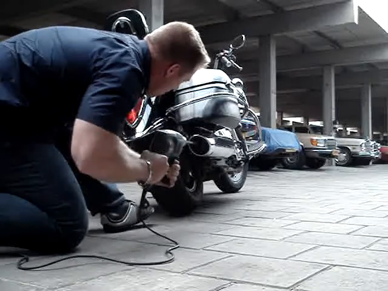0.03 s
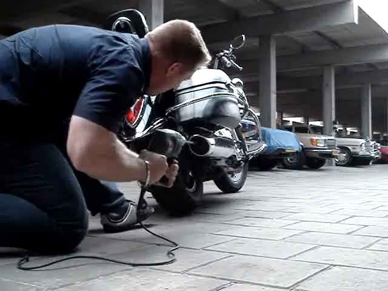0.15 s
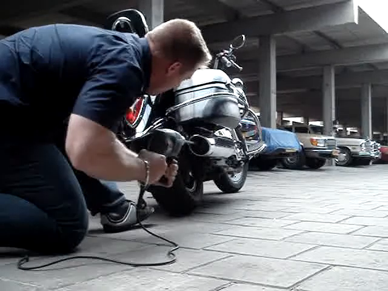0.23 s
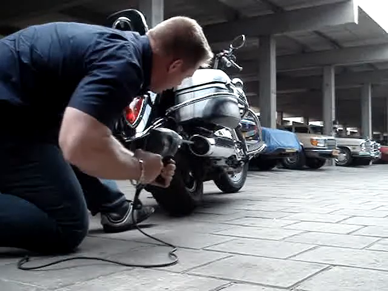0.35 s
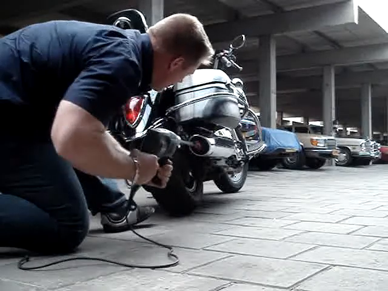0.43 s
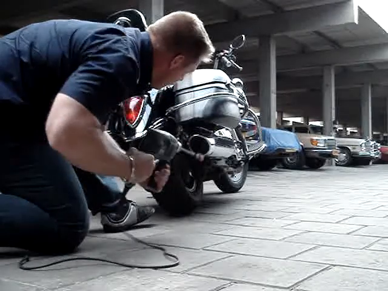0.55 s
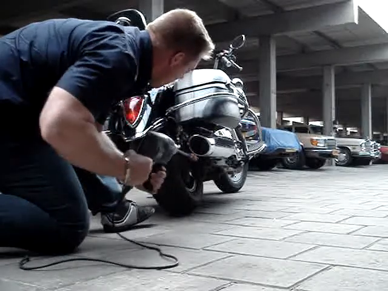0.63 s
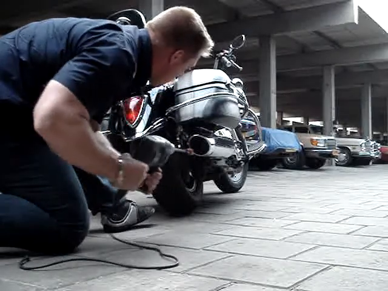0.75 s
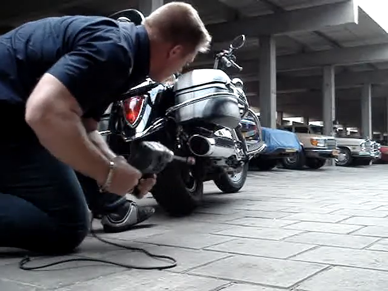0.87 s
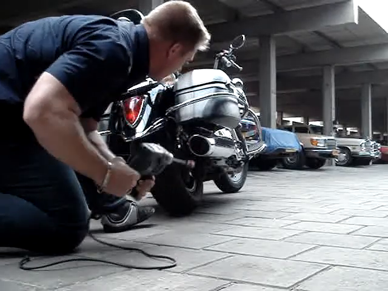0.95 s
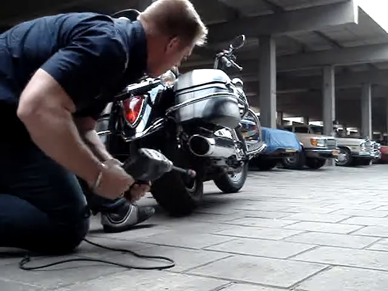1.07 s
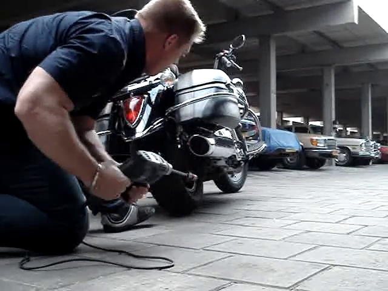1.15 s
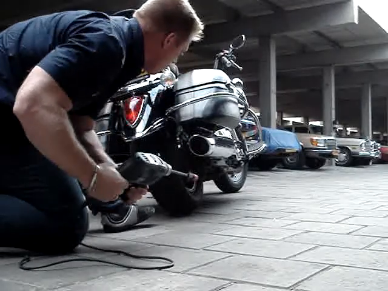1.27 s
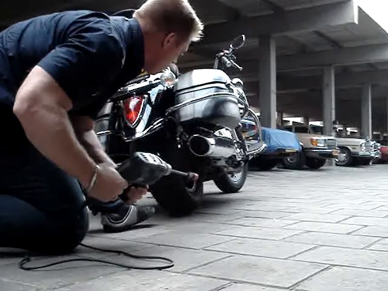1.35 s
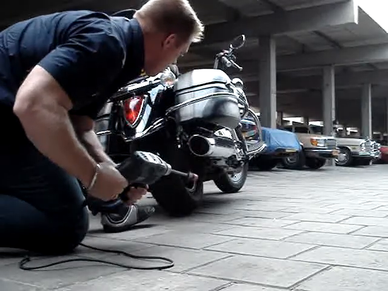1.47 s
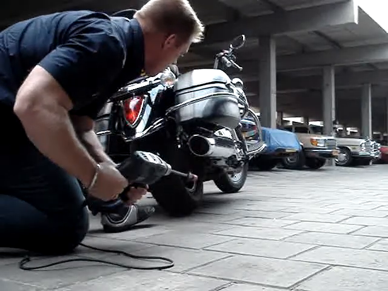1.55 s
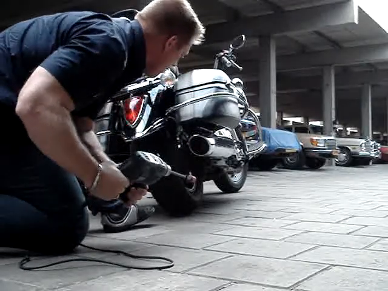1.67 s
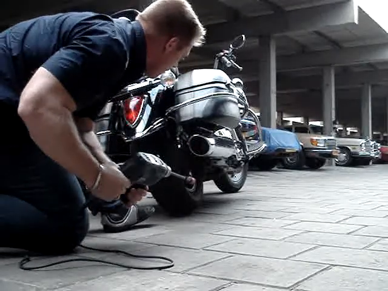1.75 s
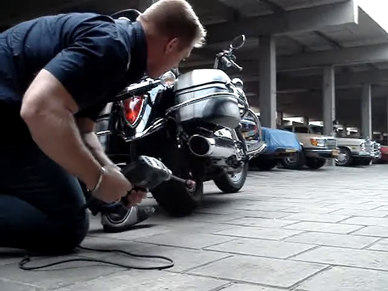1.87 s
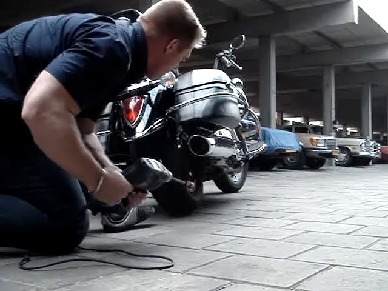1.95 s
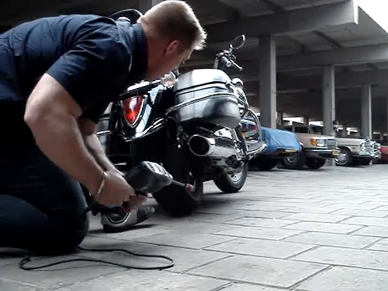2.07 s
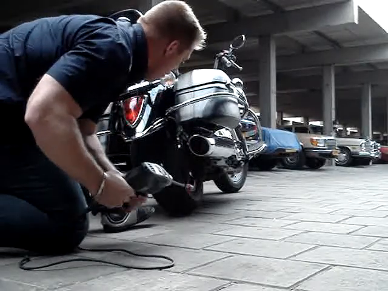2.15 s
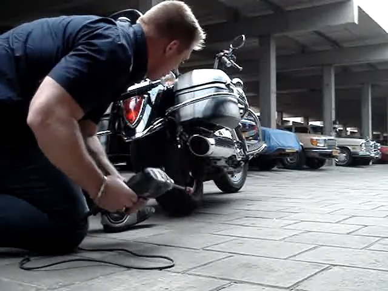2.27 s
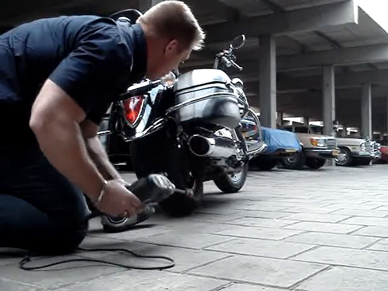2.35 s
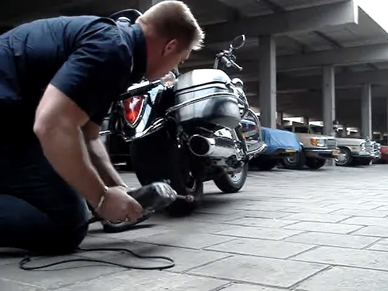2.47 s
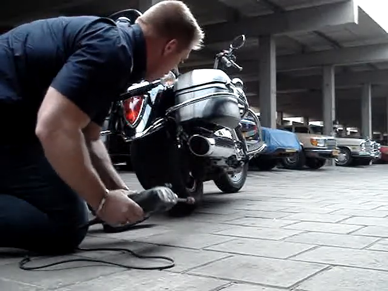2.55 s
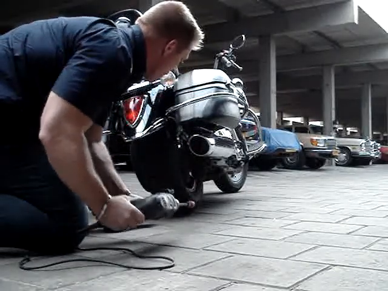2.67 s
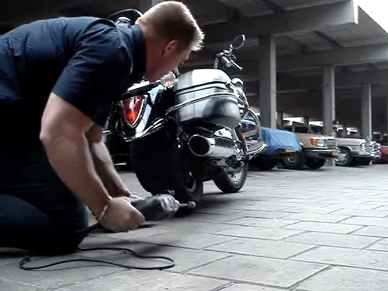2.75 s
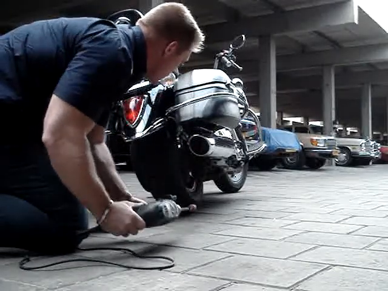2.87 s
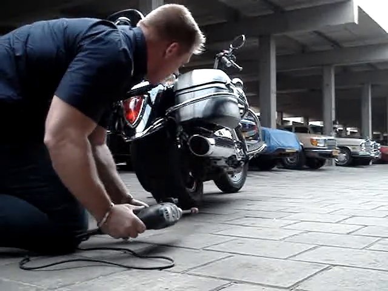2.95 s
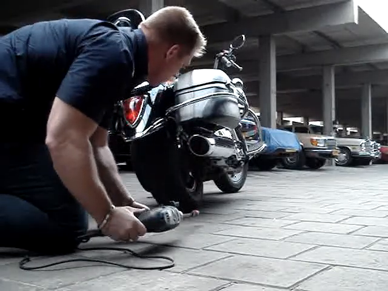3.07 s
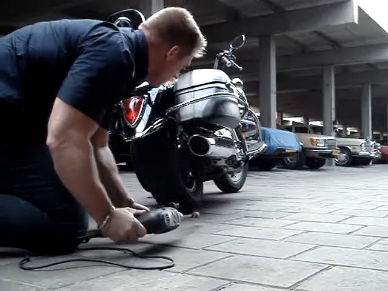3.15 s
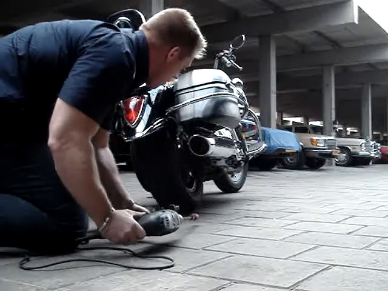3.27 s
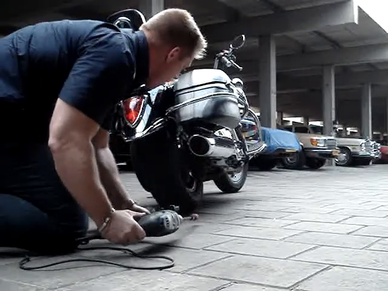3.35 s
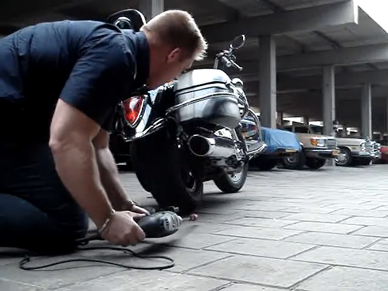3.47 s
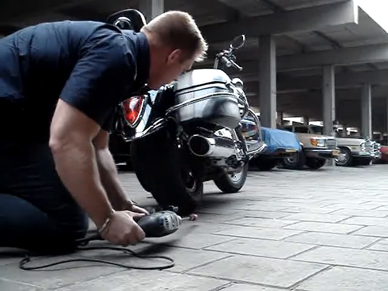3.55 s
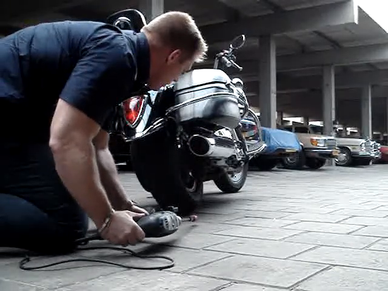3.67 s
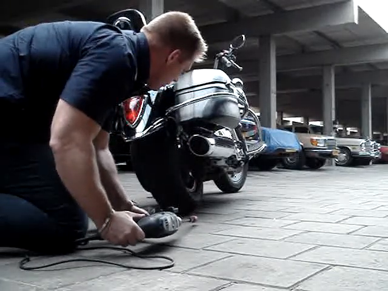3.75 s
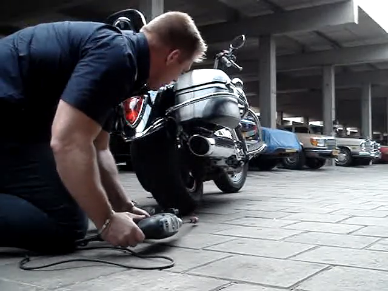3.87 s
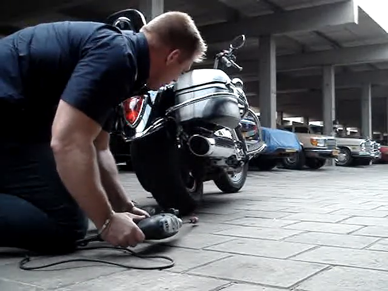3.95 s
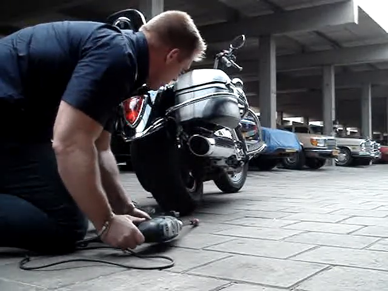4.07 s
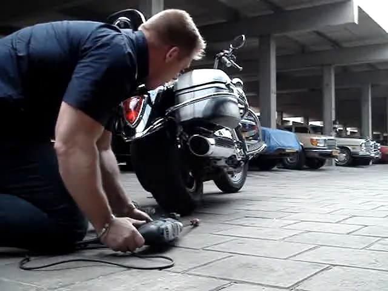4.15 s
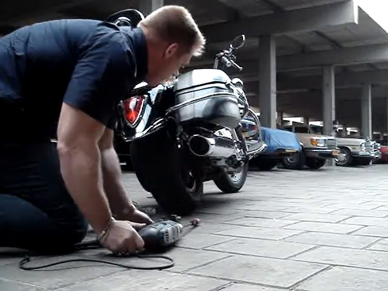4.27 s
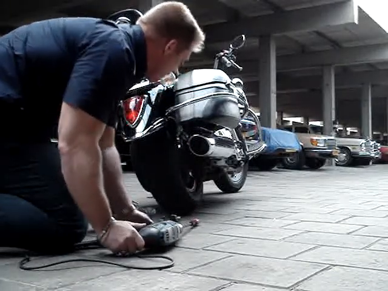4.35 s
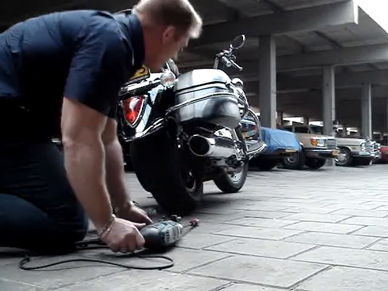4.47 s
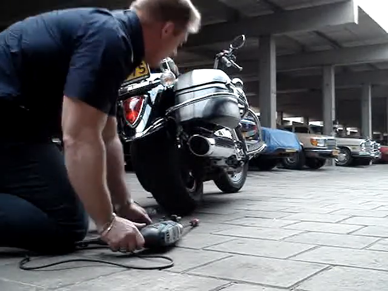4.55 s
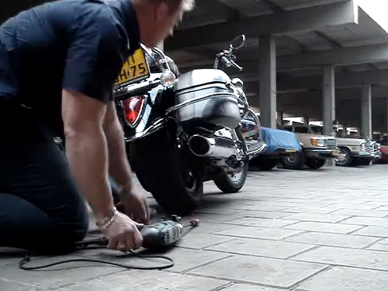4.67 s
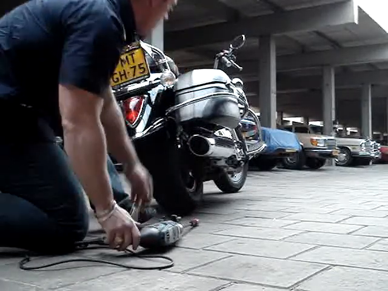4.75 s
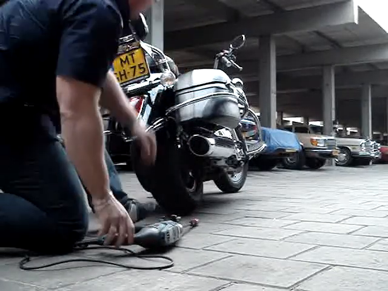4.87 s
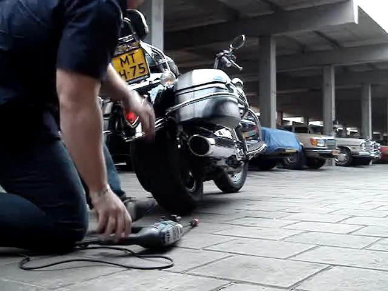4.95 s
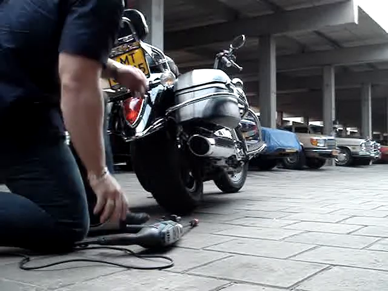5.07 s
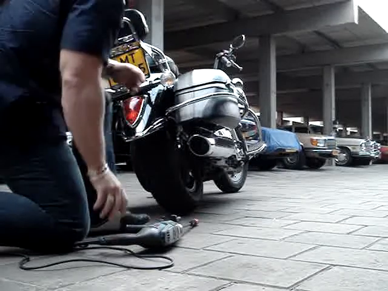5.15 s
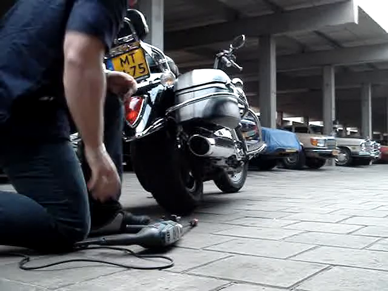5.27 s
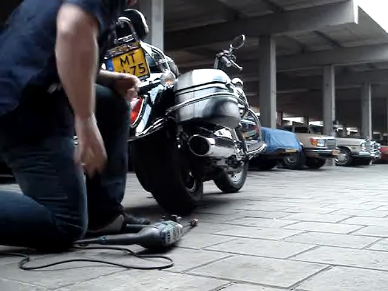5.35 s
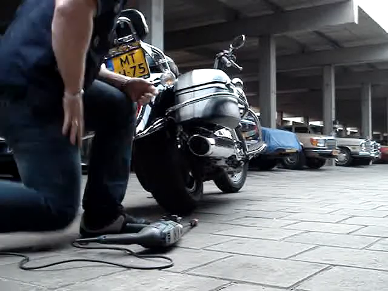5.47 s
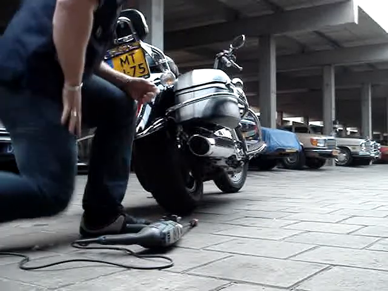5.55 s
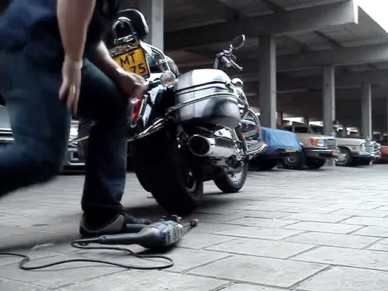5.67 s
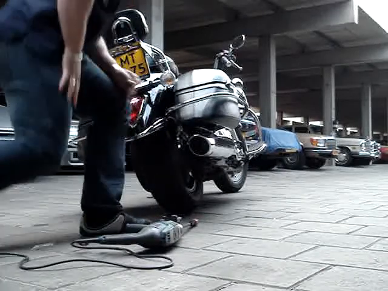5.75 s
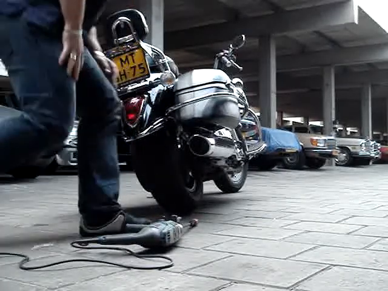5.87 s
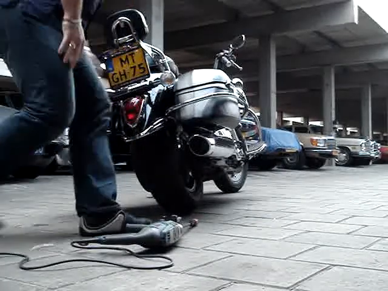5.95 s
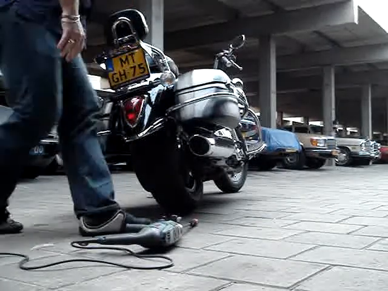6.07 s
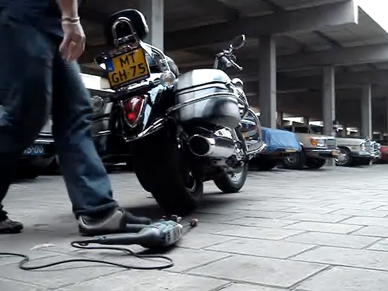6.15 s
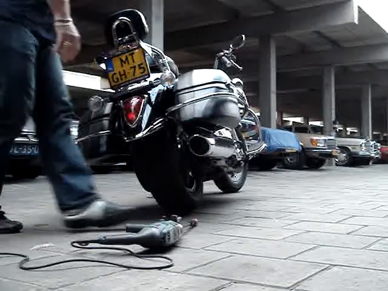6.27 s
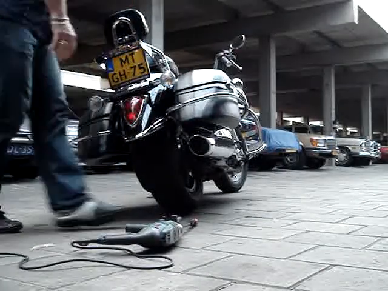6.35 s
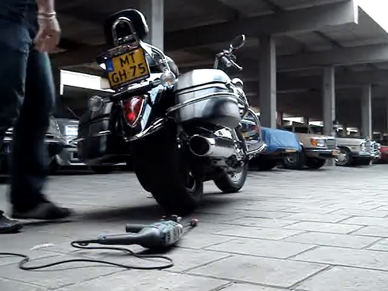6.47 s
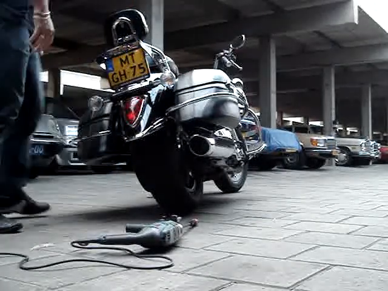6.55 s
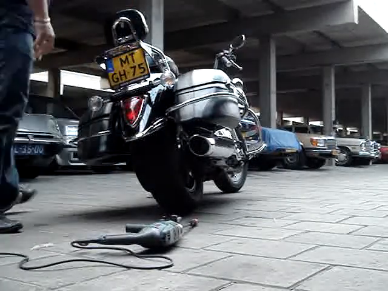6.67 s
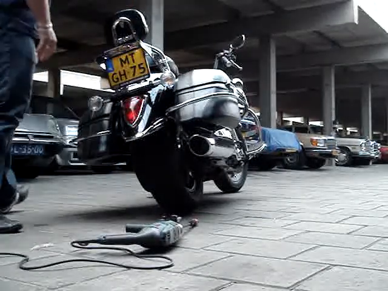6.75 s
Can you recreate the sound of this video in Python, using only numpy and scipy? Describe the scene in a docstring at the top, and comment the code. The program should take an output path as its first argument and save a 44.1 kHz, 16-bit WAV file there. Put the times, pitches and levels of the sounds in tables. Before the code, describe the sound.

A corded drill grinds on a steel pipe, then winds down, followed by a few knocks and shoe scuffs on paving.

```python
"""Drill on an exhaust pipe, open parking deck

Close to one microphone, a corded drill grinds at the mouth of a motorcycle's steel exhaust pipe, which
rings as the bit scrapes and catches. Pulled off, the drill coasts to a stop, its gear and commutator
whines sliding down through the housing resonances. The man lays it on the paving, stands up and steps
away. The concrete roof and pillars throw back short echoes; the town rumbles in the distance."""
import sys
import numpy as np
from scipy import signal
from scipy.fft import rfft, irfft, next_fast_len
from scipy.io import wavfile

SR = 44100
rng = np.random.default_rng(int(sys.argv[2]) if len(sys.argv) > 2 else 0)


def persist_wave(psi):
    """Save psi, clipped to +-1, as 16-bit WAV."""
    counts = np.round(np.clip(psi, -1, 1) * 32767).astype(np.int16)
    wavfile.write(sys.argv[1], SR, np.atleast_2d(counts).T)


N = 300317
TIME = np.arange(N) / SR

# gear mesh tones: (multiple of rotor speed, relative level [dB])
MESH_TONES = [(12, 7), (18, 3), (36, 3), (60, 1), (72, 3), (84, -2), (96, -3), (108, -6), (120, -2),
              (132, -7), (144, -7)]
# drill housing, rattled by the teeth: (frequency [Hz], width [Hz], relative level [dB])
HOUSING_MODES = [(654, 60, -14), (900, 110, -11), (1490, 70, -5), (1643, 80, 0), (1788, 160, -1.5),
                 (2120, 80, -2), (2210, 190, -3.5), (2770, 190, -4.5), (3570, 330, -8), (6600, 1200, -2)]
# gear case: (frequency [Hz], width [Hz], then level [dB] for commutator, fan, commutator octave, teeth)
GEARCASE_MODES = [(680, 130, -53, -70, -66, -61), (980, 200, -50, -70, -62, -66),
                  (1340, 120, -46, -66, -56, -63), (1630, 100, -35, -62, -52, -50),
                  (1750, 110, -37, -62, -45, -55), (1930, 80, -38, -62, -48, -58),
                  (2090, 180, -44, -62, -38.5, -47), (2320, 200, -58, -60, -46, -60),
                  (2830, 170, -43, -54, -54, -53), (3760, 330, -31, -58, -55, -61),
                  (4350, 220, -37, -46, -58, -58), (4880, 380, -29, -48, -46, -66),
                  (5230, 220, -39, -38, -46, -52), (6100, 320, -30.5, -32, -46, -51),
                  (6550, 330, -33, -37, -33.5, -46), (7100, 520, -39, -31, -46, -52),
                  (8000, 400, -48, -26.5, -54, -53), (8950, 650, -54, -27.5, -53, -53),
                  (9750, 450, -58, -34, -54, -58)]
# the slowing spindle rubs: (peak time [s], boost of the running noise [dB], half length [s])
SPINDLE_RUBS = [(1.998, -1, 0.023), (2.79, 0.5, .04), (3.086, 4.5, 0.069)]
# steel pipe: (frequency [Hz], width [Hz], relative level rubbed [dB], relative level struck [dB])
PIPE_MODES = [(543, 10, -4.5, .5), (665, 25, -16, -10), (735, 12, -4, -12), (917, 14, -3, -14),
              (1050, 20, -9, -7), (1338, 12, -5, -20), (1390, 8, -1, -16), (1432, 12, -5, -20),
              (2196, 6, -3.5, -22), (2408, 4, 1.5, 0), (2745, 14, -2, -10), (3208, 7, 1.5, -7),
              (3768, 12, -8, -20), (4110, 14, -7, -5), (4360, 14, -2.5, -20)]
# the bit catches on the rim: (time [s], blow level [dB], ring level [dB])
RIM_CATCHES = [(0.057, -16.5, -33.5), (0.176, -13.5, -56), (0.231, -15, -56), (0.490, -14, -28.5),
               (0.502, -13, -40), (0.507, -14, -45), (.5295, -13.5, -25)]
# the bit squeals: (peak time [s], level [dB], half length [s])
BIT_SQUEALS = [(0.038, -24, 0.16), (.34, -27, .07)]
# drill, hands and shoes knock:
# (time [s], level over 10 ms [dB], low edge [Hz], high edge [Hz], t60 [s], share of bright crack)
PAVING_KNOCKS = [(3.973, -53, 905, 2800, 0.017, .23), (4.132, -46.5, 690, 3200, 0.016, .23),
                 (4.2725, -48.5, 484, 4000, 0.025, .23), (4.3222, -33, 280, 2900, 0.024, .3),
                 (4.439, -40.5, 450, 2000, 0.028, .3), (5.091, -35.5, 400, 2300, 0.03, .2),
                 (5.250, -48, 3040, 6530, 0.0093, .23), (6.0695, -45.5, 700, 1800, 0.008, .08),
                 (6.1068, -38, 220, 800, 0.039, .15), (6.4165, -49.5, 2370, 5400, 0.009, .23)]
# ringing bodies: (frequency [Hz], level [dB], t60 [s])
LANDING_MODES = [(205, -39, .1), (255, -27, .04), (790, -26.5, .022), (861, -43, .3), (925, -43, .3),
                 (990, -29, .022), (1448, -50, .2), (1750, -42, .05), (2030, -53, .25), (5510, -55, .38)]  # the drill as it is laid down
HEEL_MODES = [(330, -32.5, .03), (470, -32.5, .03), (690, -32.5, .03)]  # the hollow heel of the first step
# soles and cloth slide: (peak time [s], level [dB], rise [s], fall [s], low edge [Hz], high edge [Hz])
SOLE_AND_CLOTH_SCUFFS = [(5.106, -40, 0.0095, 0.046, 646, 11000), (5.105, -43.5, .012, .03, 1500, 2100),
                         (5.32, -60, 0.02, 0.054, 4000, 9200), (5.428, -40.5, 0.0043, 0.0055, 2800, 5870),
                         (5.56, -51.5, 0.07, 0.072, 350, 1710), (5.7, -56.5, 0.66, 0.49, 1120, 8600),
                         (6.255, -51, 0.074, 0.068, 920, 9000), (6.251, -48, 0.013, 0.019, 1700, 6000),
                         (6.287, -49.5, 0.011, 0.016, 3600, 10000)]
# reflections off roof and pillars: (delay [s], level [dB])
DECK_ECHOES = [(.015, -24), (.024, -22), (.052, -24), (.073, -24)]
# noise spectra: (frequency [Hz], relative level [dB])
FAN_SPECTRUM = [(60, -39.5), (130, -14.5), (200, -17), (320, -9), (430, -3), (560, 0.5), (900, 4.5),
                (1250, 1), (1700, -6), (3000, -1), (6000, -23.5), (8500, -12.5), (10000, -19),
                (12000, -56.5)]
GEAR_SPECTRUM = [(500, -44.5), (1100, 14), (1450, 16), (1800, 14.5), (2000, 11), (2800, -1), (3300, -4),
                 (6000, -33)]
BRUSH_SPECTRUM = [(1500, -21), (2700, -3.5), (3300, -2), (3700, 1.5), (4300, -0.5), (4650, 0), (5150, -1.5),
                  (5700, -1), (6500, -12), (8000, -36)]
BEARING_SPECTRUM = [(4500, -38.5), (5500, -3), (6000, 4), (6800, 6), (7300, 3.5), (7900, 1.5), (8600, -7.5),
                    (9400, -2), (10000, -24)]
SCRAPE_SPECTRUM = [(70, -30), (135, -3), (200, -12), (320, -31), (520, -4), (1500, 3), (2500, 5.5),
                   (4000, 5), (5000, -7), (6000, 1), (6800, 4), (7600, -3), (9500, -19)]
KNOCK_SPECTRUM = [(60, -27), (220, -20), (370, 4), (480, -1.5), (750, 4), (1150, -3), (1650, -3),
                  (2500, -5), (5500, -4.5), (10000, -14.5)]
GRIT_SPECTRUM = [(150, -12), (600, 13), (1200, 7), (1720, 6.5), (2100, 3.5), (2800, 2), (5000, 0),
                 (7500, -3), (10000, -9)]
TOWN_SPECTRUM = [(15, -46), (25, -17), (42, -6), (152, -1.5), (227, -4), (257, -3.5), (307, -5),
                 (506, -5.5), (546, -5), (684, -7), (1070, -10.5), (1220, -12), (1910, -15), (7780, -21.5),
                 (10000, -29), (13000, -86), (22000, -120)]

# loudness follows speed: (level at high speed [dB], knee [turns/s], loss per halving below it [dB])
AIR_LAW = (-24.5, 200, 15.2)
RATTLE_LAW = (-26.5, 446, 4.32)
HISS_LAW = (-23.5, 199, 12.76)
SIZZLE_LAW = (-22.5, 364, 12.5)
HUM_LAW = (-37.4, 375, 20)

WHINE_ORDERS = (24, 39, 48)  # commutator, fan, commutator octave [multiples of rotor speed]
TEETH_PER_TURN = MESH_TONES[0][0]
FULL_TURNS_PER_S, TRIGGER_OFF_S = 368, .415
FRICTION, GREASE, FAN_DRAG = 58.6, .2483, .000452  # braking [turns/s^2], [1/s], [1/turn]
LIFT_OFF_S, LIFT_FADE_S = .484, .061
SCRAPE_DB, RUBBED_RING_DB = -22, -36.5
CATCH_DECAY_S, PIPE_T60_S = .0065, .26
LANDING_S, STEP_S = 4.3225, 6.1075
CUTOFF_HZ = 10150


def drill(speed):
    """The drill, close up: gear rattle, fan air, brush hiss, bearing sizzle and whines follow the rotor."""
    # play in the gears makes the speed waver
    turns = np.cumsum(speed * (1 + .0012 * drift(70) + .001 * drift(9))) / SR
    once_a_turn = 1 + .095 * np.cos(2 * np.pi * turns)
    # just before the rotor stops, whines and sizzle die away and the teeth knock softly
    singing = np.clip((speed - 12) / 12, 0, 1)
    turning = np.clip(speed / 14, 0, 1)
    rattle = gear_rattle(turns, speed, once_a_turn)
    rattle = singing * rattle + (1 - singing) * band(rattle, 300, 5200)
    gears = loudness(RATTLE_LAW, speed) * rattle * from_db(.21 * drift(22.46))
    air = loudness(AIR_LAW, speed) * coloured(noise(), FAN_SPECTRUM)
    rasp = once_a_turn * from_db(1.1 * drift(250))
    hiss = loudness(HISS_LAW, speed) * coloured(noise() * rasp, BRUSH_SPECTRUM)
    sizzle = loudness(SIZZLE_LAW, speed) * coloured(noise() * rasp, BEARING_SPECTRUM)
    rubbing = from_db(sum(db * swell(s, half_s) for s, db, half_s in SPINDLE_RUBS))
    return turning * rubbing * (gears + air + hiss + singing * sizzle) + singing * whines(turns, speed)


def rotor_speed():
    """Turns per second: steady under power, then braked by brush friction, grease and fan drag."""
    speeds = np.linspace(FULL_TURNS_PER_S, 0, 2000)
    braking = FRICTION + GREASE * speeds + FAN_DRAG * speeds ** 2
    reached_s = TRIGGER_OFF_S + np.cumsum((speeds[0] - speeds[1]) / braking)
    return np.interp(TIME, reached_s, speeds)


def loudness(law, speed):
    """Gain of one part of the drill: level at high speed, a power of the speed below a soft knee."""
    db, knee, db_per_halving = law
    halvings = np.log2(1 + (knee / (speed + 1e-3)) ** 4) / 4
    return from_db(db - db_per_halving * halvings)


def gear_rattle(turns, speed, once_a_turn):
    """Meshing teeth shake the housing with pulses of noise; at low speed they click one by one."""
    teeth = rms_one(np.exp(.5 * np.cos(2 * np.pi * TEETH_PER_TURN * turns)) * once_a_turn)
    click_share = np.interp(speed, [60, 130], [.35, 0])
    grinding = np.sqrt(1 - click_share) * noise() * teeth
    clicking = np.sqrt(click_share) * tooth_clicks(turns, speed)
    impacts = (grinding + clicking) * from_db(2.1 * drift(160))
    # as the fan slows, the housing's own ringing stands out
    ring_share = np.interp(speed, [120, 300], [.8, .3])
    ring = np.sqrt(ring_share) * resonate(impacts, HOUSING_MODES)
    return ring + np.sqrt(1 - ring_share) * coloured(noise() * teeth, GEAR_SPECTRUM)


def tooth_clicks(turns, speed, weak_click=.4):
    """Each tooth clicks as it engages and more weakly as it lets go; unit power."""
    per_turn = 2 * TEETH_PER_TURN
    contact = np.floor(per_turn * turns)
    clicks = np.diff(contact, prepend=0) * np.where(contact % 2, weak_click, 1)
    power = per_turn * (speed + 1) / SR * (1 + weak_click ** 2) / 2
    return clicks / np.sqrt(power)


def whines(turns, speed):
    """Commutator, fan and gear teeth sing through the gear case on multiples of the rotor speed."""
    blur = np.interp(speed, [60, 250], [.27, .36])
    out = 0
    for driver, order in enumerate(WHINE_ORDERS):
        tone = whine(turns, order, speed, flutter_db=1.6, blur_rad=blur)
        out += gearcase_gain(order * speed, driver) * tone
    # slight eccentricity puts sidebands round each whine
    out *= 1 + .4 * drift(40) * np.cos(2 * np.pi * turns)
    # the teeth shift in their play, so their overtones are rougher
    for order, db in MESH_TONES:
        tone = whine(turns, order, speed, flutter_db=3.3, blur_rad=2.5 * blur)
        out += from_db(db) * gearcase_gain(order * speed, driver=len(WHINE_ORDERS)) * tone
    return out


def whine(turns, order, speed, flutter_db, blur_rad):
    """One multiple of the rotor speed, fluttering in strength and phase."""
    audible = np.interp(order * speed, [9800, CUTOFF_HZ], [1, 0])
    flutter = from_db(flutter_db * drift(55))
    phase = 2 * np.pi * order * turns + blur_rad * drift(220)
    return audible * rms_one(flutter * np.sin(phase))


def gearcase_gain(hz, driver, floor_db=-68):
    """A gliding tone swells as it crosses a gear case resonance; each driver favours its own modes."""
    grid_hz = np.arange(0, 11000, 10)
    power = sum(from_db(levels[driver]) ** 2 / (1 + ((grid_hz - centre) / width) ** 2) ** 4
                for centre, width, *levels in GEARCASE_MODES)
    return np.interp(hz, grid_hz, np.sqrt(power + from_db(floor_db) ** 2))


def rotor_hum(speed):
    """The slightly unbalanced rotor hums at its turning rate."""
    turns = np.cumsum(speed * (1 + .002 * drift(9))) / SR
    return loudness(HUM_LAW, speed) * whine(turns, 1, speed, flutter_db=2.6, blur_rad=.25)


def bit_on_pipe():
    """At the pipe's mouth the bit scrapes, squeals and catches until lifted off; the steel rings."""
    pressure = np.exp(-np.maximum(TIME - LIFT_OFF_S, 0) / LIFT_FADE_S)
    friction = coloured(noise() * from_db(2 * drift(180.2)), SCRAPE_SPECTRUM)
    scrape = from_db(SCRAPE_DB) * pressure * friction
    squealing = sum(from_db(db) * swell(s, half_s) for s, db, half_s in BIT_SQUEALS)
    squeal = squealing * steel_tone(6756, width_hz=34)
    blows, struck = np.zeros(N), np.zeros(N)
    for s, blow_db, ring_db in RIM_CATCHES:
        add(blows, from_db(blow_db) * np.exp(-TIME[:SR // 10] / CATCH_DECAY_S), s)
        add(struck, from_db(ring_db) * decay(TIME[:SR], PIPE_T60_S), s)
    rubbed = from_db(RUBBED_RING_DB) * pressure
    ring = sum(np.hypot(from_db(rub_db) * rubbed, from_db(hit_db) * struck) * steel_tone(hz, width)
               for hz, width, rub_db, hit_db in PIPE_MODES)
    catches = band(blows * coloured(noise(), SCRAPE_SPECTRUM), 220, 10000)
    return scrape + ring + squeal + catches


def steel_tone(hz, width_hz):
    """A rubbed mode keeps ringing while its phase and strength wander."""
    phase = np.cumsum(2 * np.pi * hz / SR + np.sqrt(2 * np.pi * width_hz / SR) * noise())
    return rms_one(np.sin(phase) * from_db(2 * drift(30)))


def knocks():
    """Hard contacts down on the paving: a sharp push and a short, dead rattle."""
    out, t = np.zeros(N), TIME[:SR // 5]
    grain = coloured(noise(), KNOCK_SPECTRUM)
    push = np.exp(-((t - .001) / .00074) ** 2)
    for k, (s, db, low_hz, high_hz, t60, crack) in enumerate(PAVING_KNOCKS):
        rattle = grain[k * len(t):(k + 1) * len(t)] * decay(t, t60)
        hit = band(rattle - push, low_hz, high_hz) + crack * band(rattle, 2700, 5200)
        rms_10ms = np.sqrt(np.sum(hit ** 2) / (SR // 100))
        add(out, from_db(db) * hit / rms_10ms, s)
    return out


def body_ring(modes, s):
    """Drill or heel rings briefly as it meets the paving."""
    out, t = np.zeros(N), TIME[:SR // 2]
    for hz, db, t60 in modes:
        add(out, from_db(db) * np.sin(2 * np.pi * hz * t) * decay(t, t60), s)
    return band(out, 180, 9000)


def scuffs():
    """Near the microphone, grit crunches under soles and cloth slides as the man gets up."""
    grit = coloured(noise() * from_db(2.6 * drift(700)), GRIT_SPECTRUM)
    out = 0
    for s, db, rise, fall, low_hz, high_hz in SOLE_AND_CLOTH_SCUFFS:
        stroke = swell(s, np.where(TIME < s, rise, fall))
        out += from_db(db) * stroke * rms_one(band(grit, low_hz, high_hz))
    return out


def under_roof(direct, tail_db, t60, dull_hz):
    """The direct sound reaches the microphone first, then echoes and a dull tail off the concrete."""
    t = TIME[:SR]
    build_up = np.clip(t / .0049, 0, 1) ** 2
    tail = band(rng.standard_normal(SR), 150, dull_hz) * decay(t, t60) * build_up
    response = from_db(tail_db) * tail / np.sqrt(np.sum(tail ** 2))
    for s, db in DECK_ECHOES:
        add(response, from_db(db) * np.hanning(5) / 2, s)
    return direct + signal.fftconvolve(direct, response)[:N]


def distant_town():
    """Far beyond the deck the town rumbles, with a faint thin whistle on top."""
    rumble = from_db(-52) * coloured(noise(), TOWN_SPECTRUM) * from_db(.067 * drift(14))
    whistle = from_db(-74.5) * np.sin(2 * np.pi * 7570 * TIME + 1.2 * drift(40))
    return rumble + whistle


def from_db(db):
    """Decibels to gain."""
    return 10 ** (np.asarray(db) / 20)


def rms_one(x):
    """Scale to unit power."""
    return x / np.sqrt(np.mean(x ** 2) + 1e-20)


def noise():
    """White noise."""
    return rng.standard_normal(N)


def drift(rate_hz):
    """Smooth random wander of unit spread."""
    knots = rng.standard_normal(8000)
    return rms_one(np.interp(TIME * rate_hz, np.arange(len(knots)), knots))


def swell(s, half_length_s):
    """A smooth rise and fall round a moment."""
    return np.exp(-((TIME - s) / half_length_s) ** 2)


def decay(t, t60):
    """A fall of 60 dB every t60 seconds."""
    return np.exp(-np.log(1000) * t / t60)


def coloured(x, spectrum):
    """Give a signal a spectrum, rolled off below its first point; unit power."""
    size = next_fast_len(N)
    hz, db = np.transpose(spectrum)
    bins = np.arange(size // 2 + 1) * SR / size + 1e-3
    gain = from_db(np.interp(np.log(bins), np.log(hz), db)) * np.minimum(bins / hz[0], 1) ** 2
    return rms_one(irfft(rfft(x, size) * gain, size)[:N])


def resonate(x, modes):
    """Parallel resonances of alternating sign, each at its own power; unit power in all."""
    out = 0
    for k, (hz, width, db) in enumerate(modes):
        radius = np.exp(-np.pi * width / SR)
        feedback = [1, -2 * radius * np.cos(2 * np.pi * hz / SR), radius ** 2]
        out += (-1) ** k * from_db(db) * rms_one(signal.lfilter([1, 0, -1], feedback, x))
    return rms_one(out)


def band(x, low_hz, high_hz):
    """Gentle causal band-pass."""
    return signal.sosfilt(signal.butter(2, [low_hz, high_hz], "band", fs=SR, output="sos"), x + 1e-18)


def add(out, x, s):
    """Mix a short sound in at a time."""
    at = int(s * SR)
    out[at:at + len(x)] += x[:N - at]


def scene():
    """One microphone under the deck's roof, the same on both channels."""
    speed = rotor_speed()
    work = under_roof(drill(speed) + bit_on_pipe(), tail_db=-13.5, t60=.5, dull_hz=8500)
    contacts = knocks() + body_ring(LANDING_MODES, LANDING_S) + body_ring(HEEL_MODES, STEP_S)
    handling = under_roof(contacts, tail_db=-11, t60=.67, dull_hz=3520)
    movement = under_roof(scuffs(), tail_db=-17.5, t60=.9, dull_hz=2980)
    return np.tile(work + rotor_hum(speed) + handling + movement + distant_town(), (2, 1))


def record(dry):
    """Behind the microphone, the highest peaks are clipped and the top is cut steeply."""
    low_pass = signal.ellip(12, .1, 80, CUTOFF_HZ, fs=SR, output="sos")
    return signal.sosfilt(low_pass, np.clip(dry, -.65, .65))


dry = scene()
out = record(dry)
persist_wave(out)
```